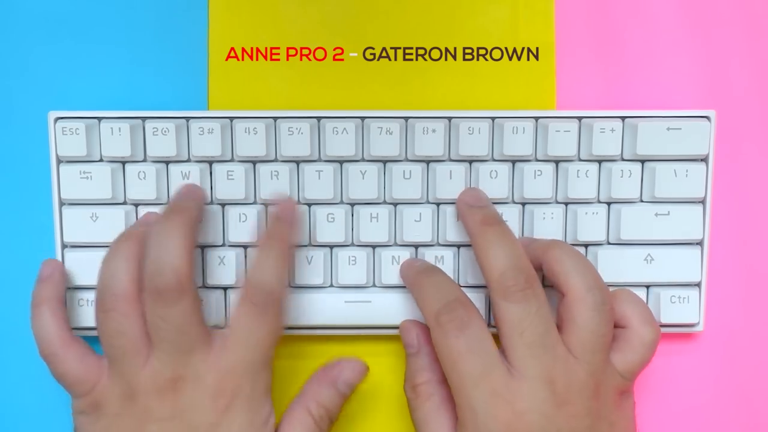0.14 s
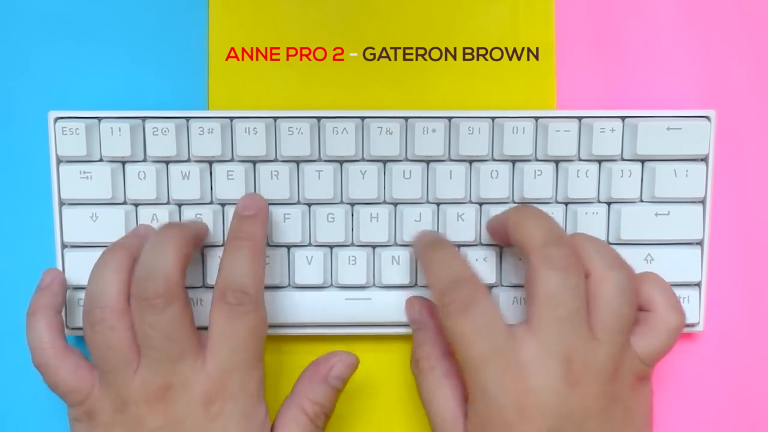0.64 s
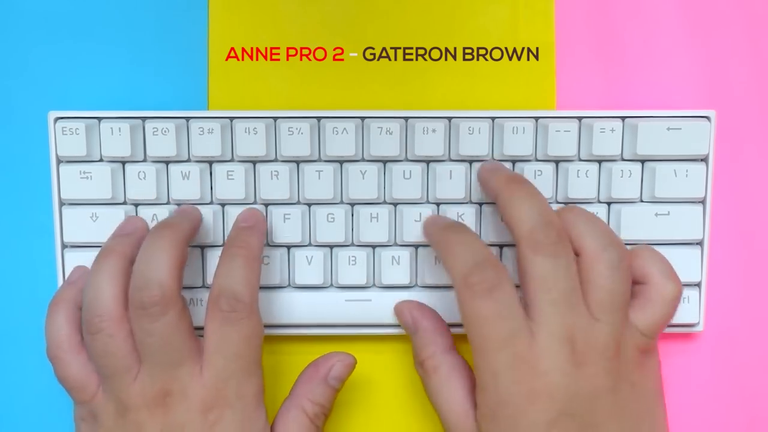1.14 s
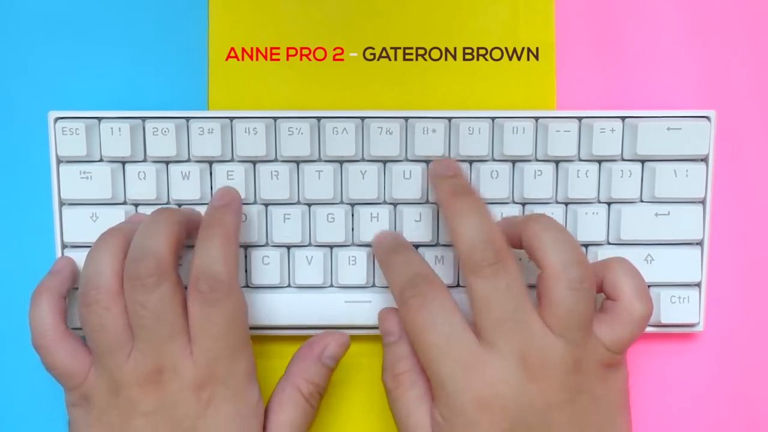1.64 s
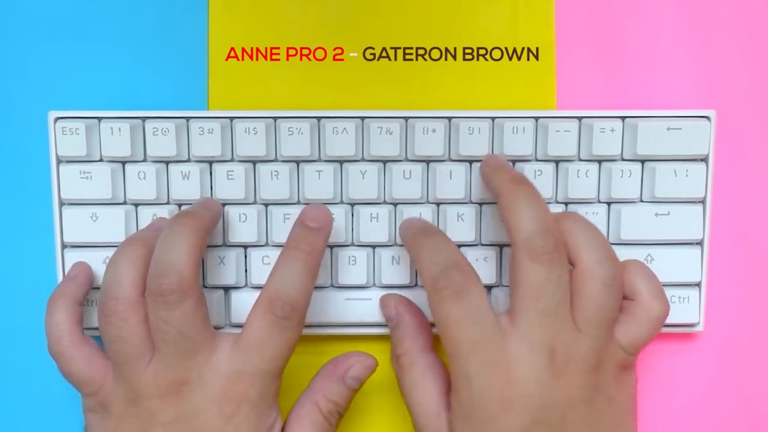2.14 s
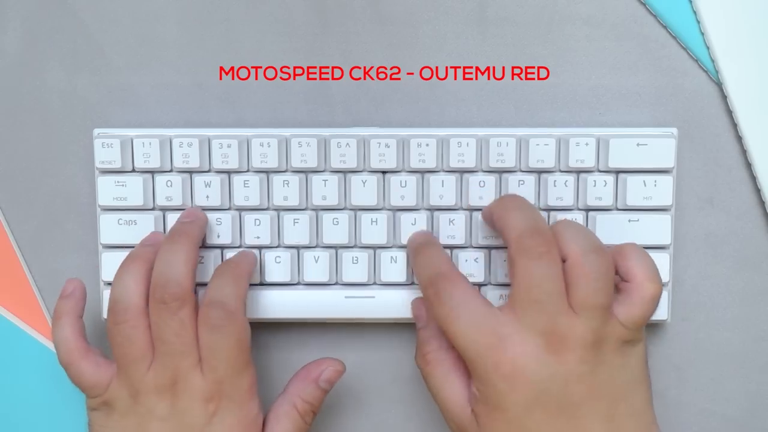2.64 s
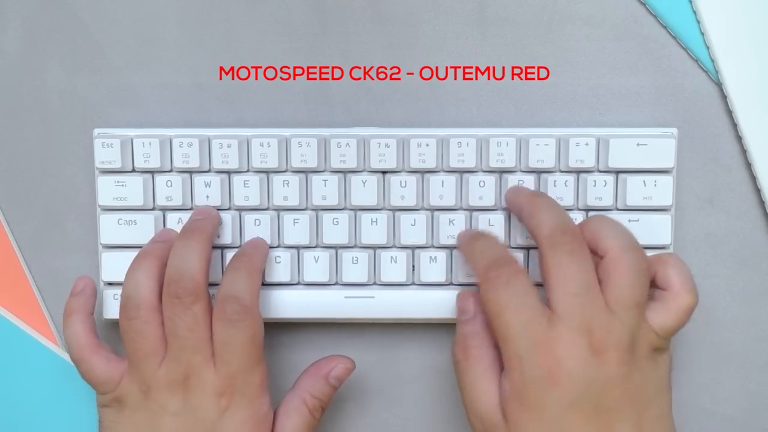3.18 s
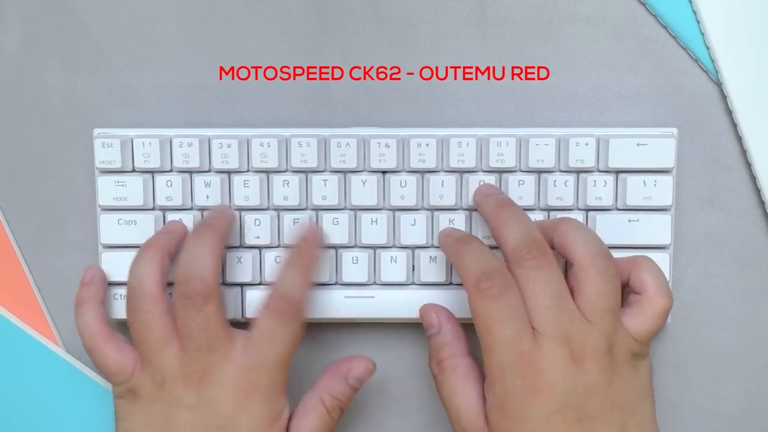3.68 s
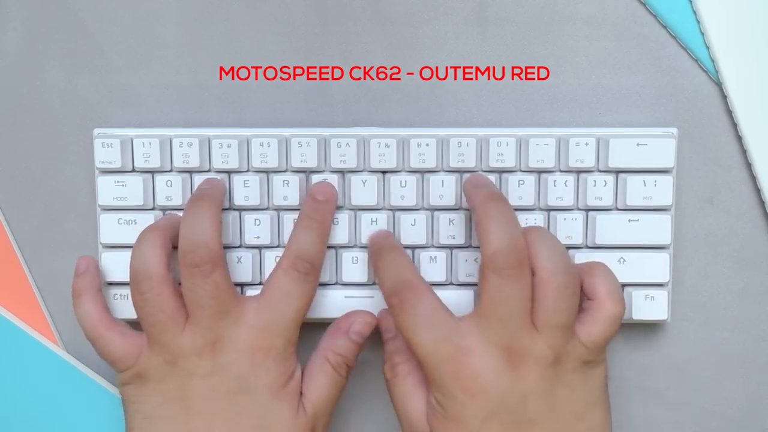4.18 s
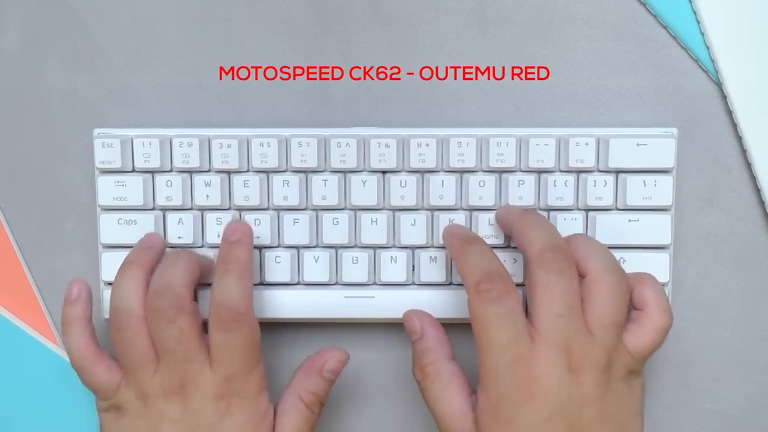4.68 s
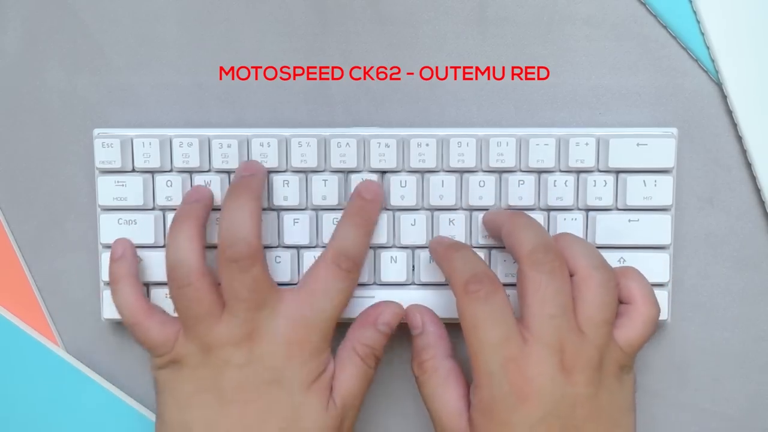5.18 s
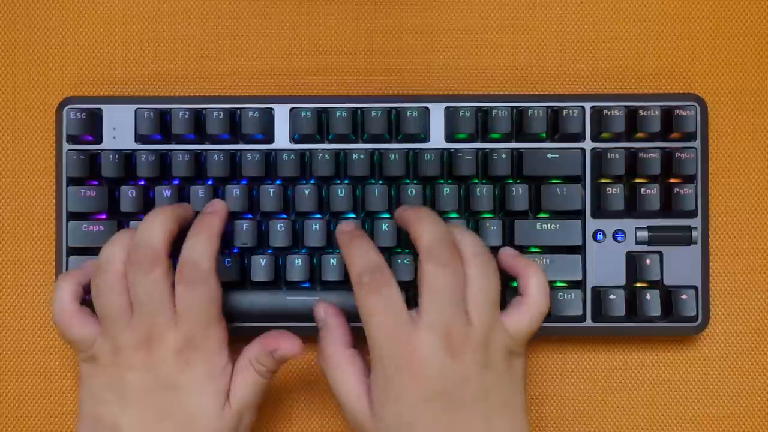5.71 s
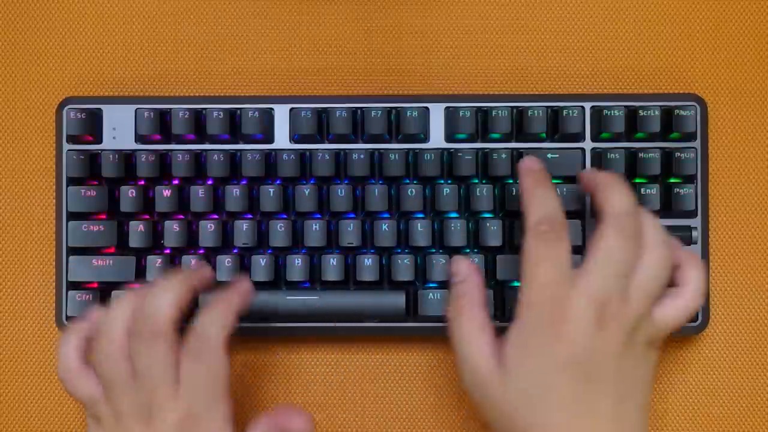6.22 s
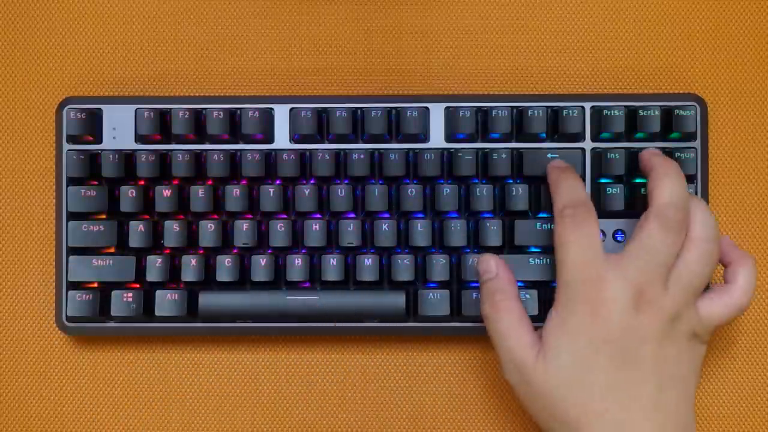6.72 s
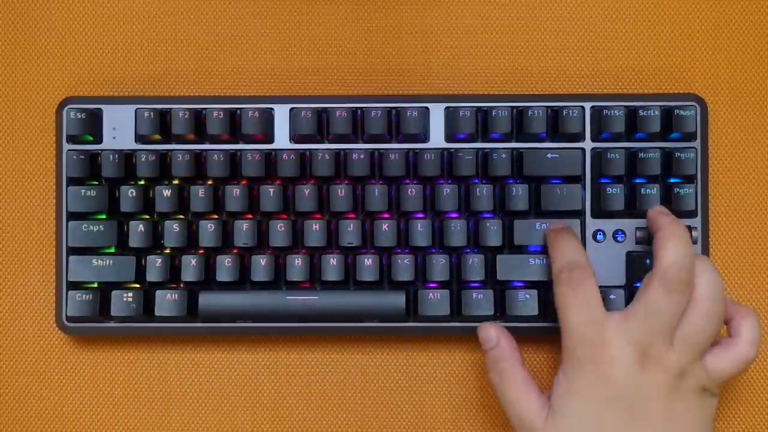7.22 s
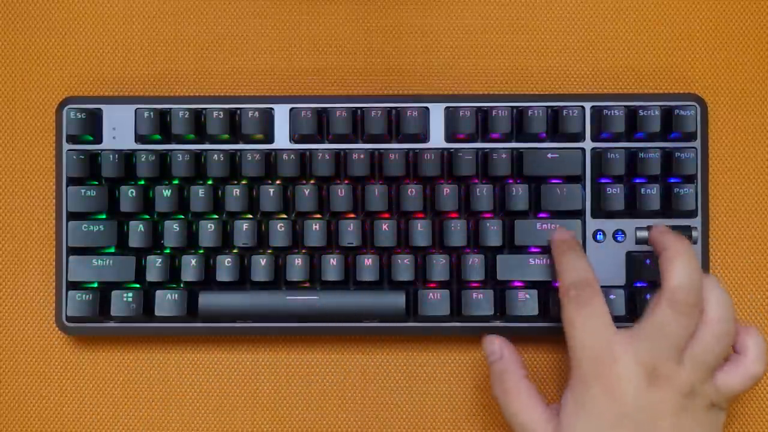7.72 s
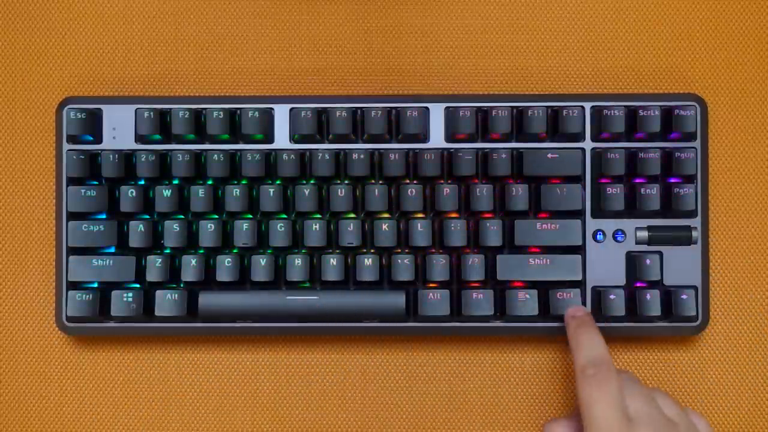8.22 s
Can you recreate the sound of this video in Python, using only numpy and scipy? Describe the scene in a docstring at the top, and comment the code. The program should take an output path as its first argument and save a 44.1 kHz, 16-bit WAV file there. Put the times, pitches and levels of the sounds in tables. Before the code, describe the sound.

Three mechanical keyboards are typed on in turn, close to a stereo microphone in a small, quiet room with short, bright reflections. From 0 to about 2.1 seconds, fast, uneven typing gives crisp plastic clacks with little bass, strongest around 0.4 to 0.9. At about 2.2 a second board takes over, louder and fuller, with hard knocks, fingertip taps on the caps and brief rattles from wide keys; heavier strikes fall near 2.5, 4.1, 4.3, 4.5 and 5.3. From about 5.6 the third board sounds thinner and clickier, leaning to the right in the highs. A wide key thumps at 5.7, light typing continues to 6.2, then single presses and their releases come from 6.45 to 6.95, 7.3 to 7.8 and 8.1 to 8.3, with near-silence between them.

```python
"""Typing on three mechanical keyboards

Fingers type close to a stereo microphone on three boards in turn, in a small room; the third has clicky switches.
Stem, fingertip, cap and click-leaf contacts each stutter onto ringing modes, with a noise snap and a scrape ahead.
Wide keys rattle on and thump the case; low noise follows the typing as desk rumble.
Noise echoes make the room, and a faint room tone of coloured, flickering noise lies below."""
import sys
import numpy as np
from scipy import signal
from scipy.fft import rfft, irfft, next_fast_len
from scipy.io import wavfile

SR = 44100
rng = np.random.default_rng(int(sys.argv[2]) if len(sys.argv) > 2 else 0)


def digitize_waveform(pressure):
    """Quantize a signal to 16-bit integers and store it at the path in sys.argv[1].

    Rows of a 2-D input are taken as channels; values are limited to [-1, 1].
    """
    field = np.atleast_2d(pressure).T
    bounded = np.clip(field, -1, 1)
    quanta = np.round(bounded * 32767).astype(np.int16)
    wavfile.write(sys.argv[1], SR, quanta)


def rack_gain(trim_db):
    """Turn a fader trim in dB into the linear factor to multiply a signal by."""
    fader = np.asarray(trim_db, float)
    return 10 ** (fader / 20)


N = 368676  # samples


def rms_one(x):
    """Scale to unit rms."""
    return x / np.sqrt(np.mean(x ** 2) + 1e-20)


def at_hz(points, hz, column=1):
    """Read a table on a log-frequency axis."""
    points = np.array(points)
    return np.interp(np.log(np.maximum(hz, 1)), np.log(points[:, 0]), points[:, column])


def band(x, low_hz, high_hz, order=2):
    """Causal band-pass."""
    return signal.sosfilt(signal.butter(order, [low_hz, high_hz], "band", fs=SR, output="sos"), x)


def pair(mid, side, alike, axis=0):
    """Left and right from two unrelated signals with a given likeness, stacked on the given axis."""
    alike = np.clip(alike, 0, 1)
    shared = np.sqrt(1 + alike) * mid
    apart = np.sqrt(1 - alike) * side
    return np.stack([shared + apart, shared - apart], axis=axis) / np.sqrt(2)


def dying(t, t60):
    """Exponential fall of 60 dB in t60 seconds (2 ms at the shortest)."""
    return rack_gain(-60 * t / np.maximum(t60, .002))


# Colour of the room tone. Each row: frequency in Hz, relative level in dB per Hz.
ROOM_TONE = [(60, -12), (400, -22), (620, -14), (750, 0), (900, -10), (1900, -13), (2600, -26), (8000, -27),
             (16500, -25)]
# The room, for the tone's width and the echoes. Each row: frequency in Hz, tail t60 in seconds,
# echo level in dB before each board's trim and tilt, left-right likeness from 0 to 1.
ROOM = [(149.7, 0.13, -13.5, 1), (540, 0.28, 1, 0.94), (1280, 0.23, -2.5, 0.87), (2700, 0.29, -4, 0.66),
        (4355, 0.27, -2.5, 0.12), (7600, 0.25, -2, 0.063), (13030, 0.2, -4, 0.048)]


def room_tone():
    """Faint stereo noise, densest around 750 Hz, whose level flickers."""
    level_db, flicker_db, flicker_samples = -77.5, 1.5, 300
    hz = np.arange(N // 2 + 1) * SR / N
    mid, side = rfft(rng.standard_normal((2, N))) * rack_gain(at_hz(ROOM_TONE, hz))
    tone = rms_one(irfft(pair(mid, side, at_hz(ROOM, hz, column=3)), N))
    points = np.arange(N // flicker_samples + 2)
    flicker = np.interp(np.arange(N) / flicker_samples, points, rng.standard_normal(len(points)))
    return rack_gain(level_db + flicker_db * flicker) * tone


def desk_rumble(sound, board):
    """The desk top shakes softly while keys are struck: low noise that follows the lingering energy."""
    low_hz, high_hz = [(60, 140), (60, 170), (70, 300)][board]
    level_db, hold_s = [-31, -32.5, -26.5][board], 0.011
    r = np.exp(-1 / (hold_s * SR))
    energy = signal.lfilter([1 - r], [1, -r], np.mean(sound ** 2, axis=0))
    mid, side = band(rng.standard_normal((2, N)), low_hz, high_hz)
    return rack_gain(level_db) * np.sqrt(energy) * rms_one(pair(mid, side, 0.77))


# When the typing moves on to the next board, in seconds.
BOARD_CHANGES_S = [2.15, 5.56]
# Wide keys, whose stabiliser wire keeps rattling after the contact.
# Each row: start in seconds, rattle t60 in seconds, thump level in dB before its swell and decay.
WIDE_KEYS = [(.666, 0.0072, -35), (.712, 0.016, -41.5), (2.209, 0.031, -35), (2.286, 0.013, -44.5),
             (2.582, 0.2, -49), (2.593, 0.1, -49.5), (4.128, 0.037, -47), (4.139, 0.093, -51),
             (4.236, 0.037, -35), (4.476, 0.033, -49), (5.324, 0.1, -53), (5.339, 0.071, -43.5),
             (5.681, 0.15, -27.5), (6.454, 0.63, -47), (6.866, 0.024, -47), (7.285, 0.051, -44.5),
             (7.727, 0.037, -46), (8.141, 0.031, -46)]


def thumps():
    """A wide key pushes the whole case onto the desk: a dull low knock that swells and dies."""
    t60_s, rise_s = .15, .006
    bands_hz = [(129, 246), (110, 510), (128, 470)]  # by board
    out, t = np.zeros(N + SR), np.arange(SR // 2) / SR
    swell = dying(t, t60_s) * (1 - dying(t, rise_s))
    for start_s, _, thump_db in WIDE_KEYS:
        low_hz, high_hz = bands_hz[np.searchsorted(BOARD_CHANGES_S, start_s)]
        dull = rms_one(band(rng.standard_normal(len(t)), low_hz, high_hz))
        out[round(start_s * SR):][:len(t)] += rack_gain(thump_db) * swell * dull
    return out[:N]


def room_response():
    """Desk and wall echoes as noise dying band by band: a quick early fall over a slower tail."""
    gap_s, early_t60_s, early_db = .003, 0.024, -17
    t, out = np.arange(SR // 2) / SR, 0
    edges_hz = 70 * 2 ** np.arange(0, 8.1, .5)
    white = rng.standard_normal((2, 2, len(t)))
    for k, (low, high) in enumerate(zip(edges_hz, edges_hz[1:])):
        hz = np.sqrt(low * high)
        fall = dying(t, at_hz(ROOM, hz)) + rack_gain(early_db) * dying(t, early_t60_s)
        mid, side = band(white[k % 2] * fall, low, high)  # neighbouring bands use unrelated noise
        echo = rms_one(pair(mid, side, at_hz(ROOM, hz, column=3)))
        unit_energy = np.sqrt(2 * (high - low) / SR / len(t))
        out = out + rack_gain(at_hz(ROOM, hz, column=2)) * echo * unit_energy
    return np.pad(out, ((0, 0), (round(gap_s * SR), 0)))


def chatter(rows, t):
    """A contact is one first touch and a quick dying stutter; on wide keys a rattle joins in."""
    touches_per_s, chatter_t60_s, chatter_db, rattle_db = 2500, 0.019, 0.5, -16
    stutter = np.tile(rack_gain(chatter_db) * dying(t, chatter_t60_s), (len(rows), 1))
    for start_s, rattle_s, _ in WIDE_KEYS:
        wide = abs(rows[:, 0] - start_s) < .004
        stutter[wide] += rack_gain(rattle_db) * dying(t, rattle_s)
    touched = rng.random(stutter.shape) < touches_per_s / SR
    return rng.standard_normal(stutter.shape) * touched * stutter + (t == 0)


# Left-right likeness of the direct sound. Each row: frequency in Hz, likeness from 0 to 1.
DIRECT_LIKENESS = [(800, .995), (3000, .96), (6000, .82), (15000, .8)]
# Ringing modes, one list for each board. Each row: frequency in Hz, relative level in dB within its part.
BOARD_MODES = [
    [(210, 2), (420, -51.5), (640, 21), (950, -5), (1300, 11.5), (1600, -8.5), (1900, 6), (2250, 12),
     (2620, 40.5), (3000, 4), (3400, 5), (4300, -16.5), (5400, 9), (6500, 20), (9600, 35), (11000, 14),
     (13500, 13), (15200, -5)],
    [(165, -4.5), (320, -15.5), (540, -18), (640, 9.5), (1000, -14.5), (1370, 20), (1700, 15.5),
     (2000, -21.5), (2300, 15), (2850, 22.5), (3350, -19.5), (4200, 2.5), (5000, 1.5), (7000, 21),
     (9000, 13), (11500, -32), (14500, 12.5)],
    [(200, 7.5), (330, -5.5), (430, -7), (560, -5.5), (740, 12.5), (1000, -22), (1250, 46), (1500, 39.5),
     (1750, -13), (2000, 16), (2400, 6), (3000, 14.5), (3650, 13), (4400, -13.5), (7000, -1.5), (9400, 7),
     (11500, 6), (13000, 18.5), (14800, 34.5)],
]
USUAL_CAP_HZ = 2700  # cap pitch of touches and clicks


def ringing_modes(rows, board, t):
    """Damped sines of the board and cap, retuned and reweighted at each contact; returns pitches and rings."""
    detune, spread_db = .05, 3  # each key sits elsewhere on the plate
    ring_cycles = 16  # plastic loses 60 dB in this many cycles
    longest_ring_s = .07  # no mode has a longer t60 than this
    cap_mode_db = [42.5, 23.5, 23][board]  # the struck cap adds a mode of its own
    hz, level_db = np.transpose(BOARD_MODES[board] + [(USUAL_CAP_HZ, cap_mode_db)])
    chance = rng.standard_normal((len(rows), 3, len(hz), 1))
    tuned = hz[:, None] * (1 + detune * chance[:, 0])
    tuned[:, -1] = rows[:, -1:]
    turn = 2 * np.pi * tuned * t
    fall = dying(t, np.minimum(ring_cycles / hz[:, None], longest_ring_s))
    size = rack_gain(level_db[:, None] + spread_db * chance[:, 1]) * fall
    # high modes reach the two microphones out of step
    skew = np.arccos(np.clip(at_hz(DIRECT_LIKENESS, hz), 0, 1))[:, None] * chance[:, 2] / 2
    return hz, np.stack([size * np.sin(turn + skew), size * np.sin(turn - skew)], axis=1)


# Pitch ranges of the five parts of a contact. Each row, one per board: six band edges in Hz.
PART_EDGES_HZ = [
    [150, 800, 1800, 4600, 8000, 16500],
    [150, 800, 1800, 3800, 8000, 16500],
    [150, 800, 1800, 4300, 8000, 16500],
]
# Unpitched snap against the modes, a level in dB for each part.
SNAP_DB = [-13.5, -4.5, -14, 2.5, -8]
# Decay of the snap, a t60 in seconds for each part.
SNAP_T60_S = [0.0091, 0.03, 0.0034, 0.013, 0.0043]


def contacts(rows, board):
    """Contacts strike modes and snap noise in five bands, each led in by the stem scraping in its housing."""
    key_areas = 3  # parts of a board, each with echo paths of its own
    length, body = 3072, 220  # samples of a contact and of its loud first 5 ms
    lead = [340, 340, 240][board]  # samples of the slide
    slide_db, slide_rise_s = [-22, -23, -18.5][board], [0.12, 0.055, 0.065][board]
    t = np.arange(length) / SR
    stutter = chatter(rows, t)
    mode_hz, rings = ringing_modes(rows, board, t)
    noise = rng.standard_normal((2, len(rows), length))
    scrape = rng.standard_normal((2, len(rows), lead)) * dying(t[lead:0:-1], slide_rise_s)
    scrape = np.pad(scrape, ((0, 0), (0, 0), (0, length)))
    edges = PART_EDGES_HZ[board]
    part_of = np.searchsorted(edges, mode_hz) - 1
    hits = np.zeros((len(rows), 2, lead + length))
    for k, (low, high) in enumerate(zip(edges, edges[1:])):
        alike = at_hz(DIRECT_LIKENESS, np.sqrt(low * high))
        gain = rack_gain(rows[:, k + 1])[:, None, None]
        noise_low = max(low, high / 2)
        ring = rings[:, :, part_of == k].sum(axis=2)
        ring = signal.fftconvolve(ring, stutter[:, None], axes=2)[..., :length]
        ring = band(ring, low, high, order=4)
        snap = pair(*noise * dying(t, SNAP_T60_S[k]), alike, axis=1)
        snap = band(snap, noise_low, high, order=4)
        both = ring / ring[..., :body].std() + rack_gain(SNAP_DB[k]) * snap / snap[..., :body].std()
        hits[..., lead:] += gain * both / both[..., :body].std(axis=(1, 2), keepdims=True)
        slide = band(pair(*scrape, alike, axis=1), noise_low, high)
        hits += gain * rack_gain(slide_db) * slide / slide[..., :lead].std()
    out = np.zeros((key_areas, 2, N + lead + length))
    area = rng.integers(0, key_areas, len(rows))
    for start_s, k, hit in zip(rows[:, 0], area, hits):
        start = round(start_s * SR)
        out[k, :, start:start + lead + length] += hit
    return out[..., lead:N + lead]


# Left against right microphone, one list for each board. Each row: frequency in Hz, level difference in dB.
LEFT_SHADE = [
    [(300, 0), (2200, -0.4), (3500, -3.5), (10000, -3.5), (16000, -3)],
    [(300, 0.5), (2200, -0.9), (3500, -4.5), (10000, -4), (16000, 1.5)],
    [(300, -1), (2200, -5.5), (3500, -8), (10000, -11.5), (16000, -5)],
]


def keyboard(rows, board):
    """One board's contacts with room echoes, microphone level and time differences, and desk rumble."""
    room_db, tilt_db = [1, 1, -1.5][board], [-0.57, -0.04, 0.53][board]  # tilt per octave about 2 kHz
    left_lead_s = [1e-6, 1e-6, 1.5e-5][board]
    size = next_fast_len(N + SR)
    hz = np.arange(size // 2 + 1) * SR / size
    wet = rack_gain(room_db + tilt_db * np.log2(np.maximum(hz, 100) / 2000))
    heard = 0
    for direct in rfft(contacts(rows, board), size):
        heard = heard + direct + wet * direct.mean(axis=0) * rfft(room_response(), size)
    # half of the difference goes to each side
    lean = rack_gain(at_hz(LEFT_SHADE[board], hz) / 2) * np.exp(1j * np.pi * hz * left_lead_s)
    sound = irfft(heard * np.stack([lean, 1 / lean]), size)[:, :N]
    return sound + desk_rumble(sound, board)


# The stem lands at the bottom or returns to the top of its travel. Each row: start in seconds,
# overall level in dB, depth in dB added to the two low parts, edge in dB added to the two high parts,
# cap pitch in Hz.
STROKES = [(0.0139, -15, -14.5, -8, 2700), (0.0297, -12.5, -15, -10, 2690), (0.1198, -16, -12.5, -9, 2680),
           (0.1925, -21.5, -9.5, -5, 2630), (0.2897, -14, -9.5, -8, 2680), (0.3607, -13, -9.5, -7.5, 2670),
           (0.4329, -10, -15, -10.5, 2600), (0.4934, -9.5, -15.5, -11.5, 2510),
           (0.5644, -12.5, -13, -11.5, 2660), (0.6002, -28, -4, -7, 2580), (0.6649, -8.5, -16, -18.5, 2110),
           (0.7131, -17.5, -9, -10, 2700), (0.78, -8.5, -17.5, -14.5, 3330), (0.8723, -15, -11, -7.5, 2700),
           (0.9682, -20, -9, -9, 2700), (0.9973, -15.5, -10.5, -10.5, 2550), (1.0898, -18.5, -14, -9, 2640),
           (1.1567, -14, -16, -27, 2130), (1.2723, -33, -5.5, -40, 3130),
           (1.4028, -18.5, -9.5, -10.5, 2800), (1.5187, -30.5, -4, -23, 2320),
           (1.6631, -14.5, -14.5, -5.5, 2700), (1.75, -19, -11, -6.5, 2700), (1.7939, -11, -10, -10, 2270),
           (1.9037, -22.5, -6.5, -11, 2560), (2.0516, -12.5, -12, -10, 2640),
           (2.1178, -12, -15, -11.5, 2730), (2.2098, -6, -14.5, -15.5, 2000),
           (2.2861, -7, -15.5, -15, 2200), (2.3981, -8, -20, -22.5, 2740),
           (2.5222, -4.5, -23.5, -16.5, 2260), (2.5952, -6.5, -13, -6.5, 3220),
           (2.752, -12, -14.5, -22, 2920), (2.835, -15, -11, -15, 2920), (3.0392, -26, -9, -9.5, 2780),
           (3.0997, -12, -15.5, -22, 2370), (3.1954, -12.5, -9.5, -8, 2660), (3.2852, -23.5, -19, -5, 2080),
           (3.3588, -12.5, -14.5, -11, 2230), (3.416, -15, -14, -27, 2760), (3.454, -14.5, -7.5, -8, 2340),
           (3.5126, -18, -11.5, -22, 2760), (3.5833, -11, -14, -22, 2670), (3.673, -18, -14, -15, 2810),
           (3.7359, -11.5, -13, -14, 2770), (3.865, -11, -21, -19.5, 2260), (3.9308, -15, -15, -10.5, 2300),
           (4.0052, -12.5, -14.5, -14.5, 2700), (4.0949, -12.5, -13.5, -15.5, 2780),
           (4.1388, -6.5, -10.5, -7.5, 2340), (4.235, -11, -13, -12.5, 2390),
           (4.3137, -6.5, -14.5, -17, 2350), (4.4022, -15.5, -25, -15, 2700),
           (4.4762, -6.5, -11, -12, 2220), (4.5132, -16.5, -20, -12, 2590),
           (4.587, -10.5, -17.5, -17.5, 2790), (4.7141, -13, -10.5, -15.5, 2940),
           (4.809, -18, -19.5, -20, 2650), (4.9142, -18, -12.5, -22, 2640),
           (5.001, -17.5, -24.5, -18.5, 2800), (5.0126, -18, -14, -33, 2800),
           (5.1128, -22.5, -7.5, -10, 3060), (5.2328, -12, -17.5, -17.5, 2400), (5.338, -6, -12, -8, 2190),
           (5.4468, -21.5, -5, -13, 3330), (5.585, -32, -2, -9.5, 1690), (5.6806, -12.5, -6.5, -10, 1670),
           (5.8084, -29.5, 5, 4, 2370), (5.904, -32, -6.5, -14, 2810), (5.9588, -27.5, -10, -2.5, 3000),
           (6.0014, -32.5, -8, 0, 2950), (6.0888, -29, 1.5, 3.5, 2870), (6.132, -24.5, -5.5, -17, 2930),
           (6.1859, -20, -9, -10, 2960), (6.2039, -36, 7.5, -4, 2930), (6.4533, -12, -7.5, -20, 1840),
           (6.5223, -21, -8.5, -4.5, 1950), (6.6087, -19.5, 0.5, -14, 2170), (6.6633, -18, -9, -5, 3560),
           (6.73, -31, -13, -18, 3850), (6.7958, -16.5, -8.5, -6, 3470), (6.8656, -11.5, -5.5, -24, 1920),
           (6.9341, -18, -7.5, -7.5, 3340), (7.2823, -16.5, -4, -6.5, 2290),
           (7.3566, -20.5, -16, -4.5, 3360), (7.4404, -30, -9, -2, 3380), (7.5037, -21, -13.5, -4, 3530),
           (7.6014, -24.5, -22, -12, 2980), (7.65, -21, -8, -0.5, 2980), (7.7273, -15.5, -2, -14, 1920),
           (7.7982, -15.5, -11, -6, 3490), (8.1434, -18.5, -9, -3, 3000), (8.2142, -23, -7.5, -3, 1700),
           (8.2966, -18.5, -6, -6, 2220)]
# Fingertips meet or brush a cap, caps rock on their stems.
# Each row: start in seconds, overall level in dB, sharpness in dB per part, pivoting on the middle part.
TOUCHES = [(0.257, -34.5, 1.5), (0.372, -22, 1.5), (0.887, -27, 6), (1.13, -38.5, -11), (1.296, -34, 0.5),
           (1.385, -42, 8), (1.567, -37.5, -2), (2.202, -11.5, 2.5), (2.279, -14.5, 0.0), (2.372, -15, 1),
           (2.488, -17.5, -1), (2.516, -18.5, 5.5), (2.583, -13, -1.5), (2.704, -20.5, 0.0),
           (2.74, -17.5, 1), (2.788, -24, 0.0), (2.929, -35, 9), (3.031, -33, -3), (3.086, -21.5, 7),
           (3.279, -12.5, 2), (3.392, -19.5, 3.5), (3.571, -16, 2.5), (3.989, -25, 0.5), (4.128, -10, 3),
           (4.32, -17.5, -0.5), (4.39, -19, -3), (4.413, -21.5, -7.5), (4.462, -11, 2), (4.569, -17.5, 0.5),
           (4.61, -22, -2), (4.694, -18, 0.0), (4.796, -18, -1.5), (5.091, -31, 0.5), (5.311, -16.5, 5),
           (5.323, -13.5, 2.5), (6.121, -21.5, 2), (7.582, -20, 2)]
# The click leaf of the third board snaps.
# Each row: start in seconds, overall level in dB, body in dB added to the three lower parts.
CLICKS = [(5.6278, -21, 4), (5.671, -19, -2), (5.877, -18.5, 0.0), (5.9928, -15, 1), (6.0614, -18.5, 3.5),
          (6.0699, -22, 8), (6.0886, -43, 0.5), (6.1256, -12, 5.5), (6.1954, -16, -4), (6.45, -21.5, 1.5),
          (6.5969, -14, 1.5), (6.736, -12.5, 1.5), (6.8568, -10, -1), (7.2764, -32, 4), (7.428, -16, -1.5),
          (7.587, -14, -3.5), (7.7221, -13.5, 6), (8.1373, -30.5, 4.5), (8.2878, -18, -0.5)]
# Part balance of a stroke against its overall level. Each row, one per board: case thud in dB,
# plate knock in dB, cap clack in dB, stem crack in dB, spring tick in dB.
STROKE_PARTS_DB = [
    [-35, -2, -9.5, -17.5, -13],
    [-21, -3.5, -11, -10, -16.5],
    [-36, -7.5, -14, -16.5, -7],
]
# Part balance of a touch against its overall level. Each row, one per board: the same five parts in dB.
TOUCH_PARTS_DB = [
    [-29.5, -10, -6, -36, -41],
    [-41, -17, -16.5, -27.5, -32.5],
    [-53.5, -25, -26, -31, -18],
]
# Part balance of a click against its overall level: the same five parts in dB.
CLICK_PARTS_DB = [-55.5, -30.5, -23, -27, -13]


def contact_rows():
    """Start, five part levels and cap pitch of every contact, from its kind of strike."""
    wide_thud_db = 7  # wide keys shake the case more
    stroke_s, stroke_db, depth, edge, cap_hz = np.transpose(STROKES)[..., None]
    touch_s, touch_db, sharp = np.transpose(TOUCHES)[..., None]
    click_s, click_db, body = np.transpose(CLICKS)[..., None]
    part = np.arange(len(CLICK_PARTS_DB))
    low, high = part < 2, part > 2
    wide = (abs(stroke_s - np.transpose(WIDE_KEYS)[0]) < .004).any(axis=1, keepdims=True)
    stroke_board = np.searchsorted(BOARD_CHANGES_S, stroke_s[:, 0])
    touch_board = np.searchsorted(BOARD_CHANGES_S, touch_s[:, 0])
    strokes = stroke_db + np.array(STROKE_PARTS_DB)[stroke_board] + depth * low + edge * high
    strokes = strokes + wide_thud_db * wide * (part == 0)
    touches = touch_db + np.array(TOUCH_PARTS_DB)[touch_board] + sharp * (part - 2)
    clicks = click_db + np.array(CLICK_PARTS_DB) + body * ~high
    usual_cap = np.full((len(TOUCHES) + len(CLICKS), 1), USUAL_CAP_HZ)
    return np.hstack([np.vstack([stroke_s, touch_s, click_s]),
                      np.vstack([strokes, touches, clicks]),
                      np.vstack([cap_hz, usual_cap])])


def scene():
    """The three boards one after another, with case thumps, over the room tone."""
    rows = contact_rows()
    board_of = np.searchsorted(BOARD_CHANGES_S, rows[:, 0])
    boards = sum(keyboard(rows[board_of == k], k) for k in range(len(BOARD_MODES)))
    return boards + thumps() + room_tone()


def band_limit(x):
    """A steep low-pass at the top of the band."""
    return signal.sosfilt(signal.butter(12, 16970, fs=SR, output="sos"), x)


def record(dry):
    """The microphone loses the bass below 400 Hz and the top is cut at 17 kHz."""
    thin = signal.sosfilt(signal.butter(3, 400, "high", fs=SR, output="sos"), dry)
    mix = signal.sosfilt(signal.cheby2(10, 60, 17050, fs=SR, output="sos"), thin)
    return band_limit(mix)


dry = scene()
out = record(dry)
digitize_waveform(out)
```